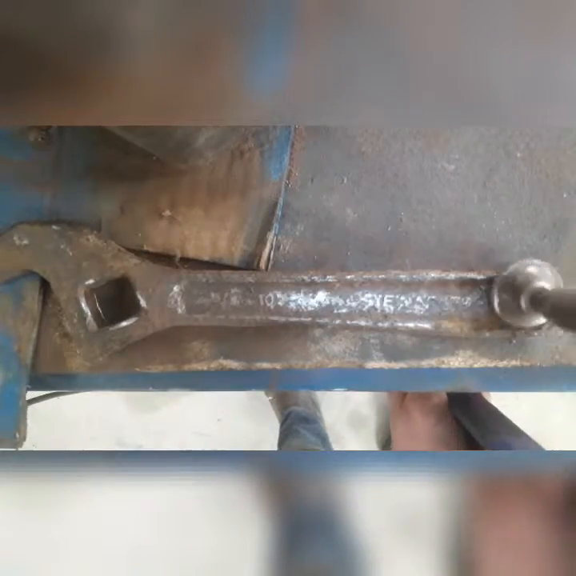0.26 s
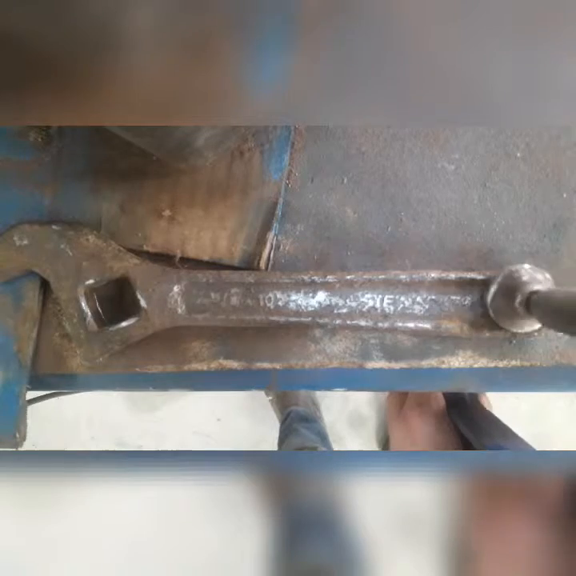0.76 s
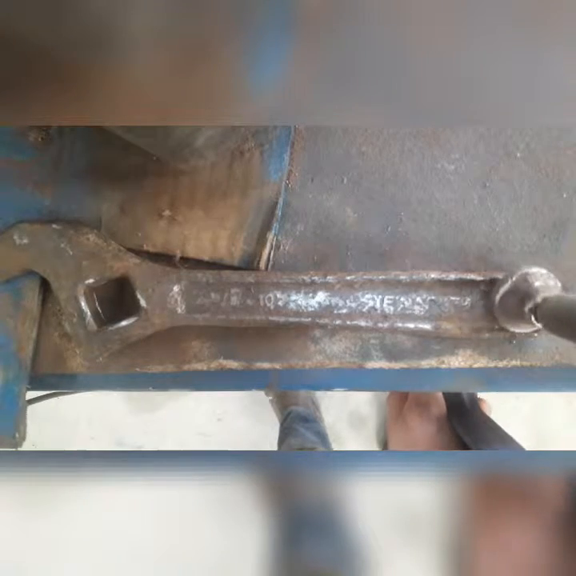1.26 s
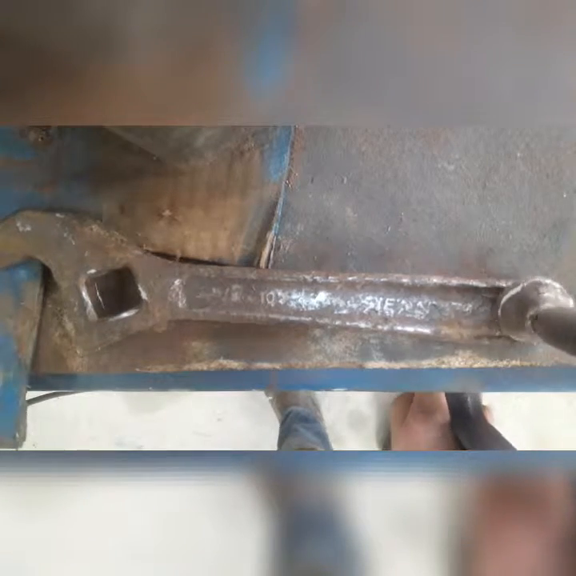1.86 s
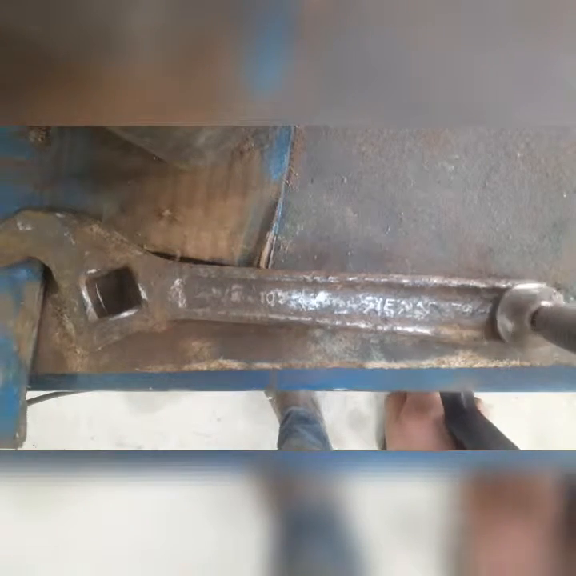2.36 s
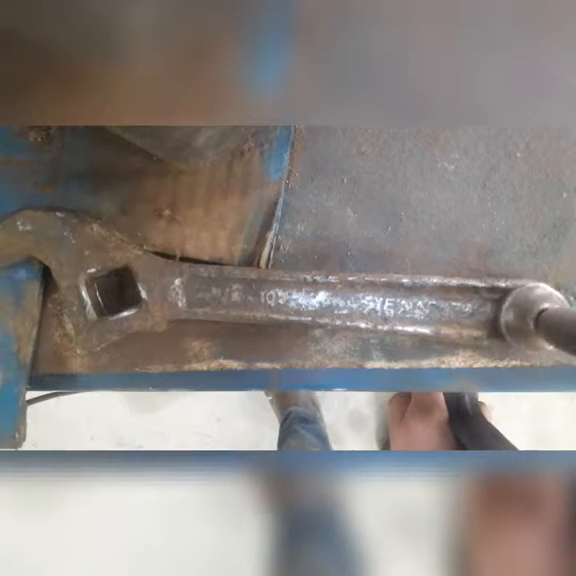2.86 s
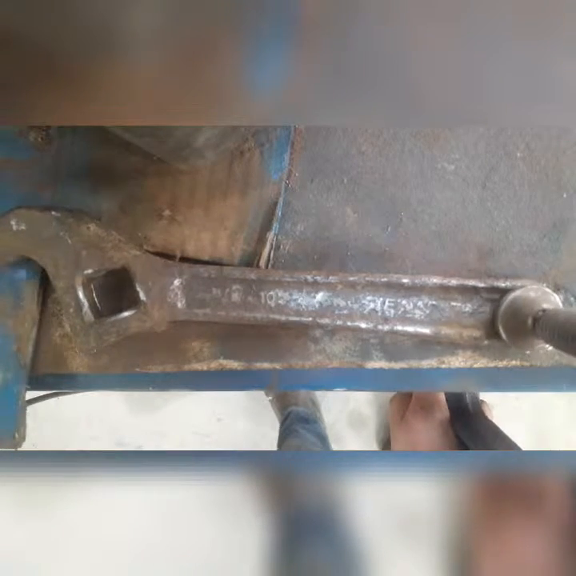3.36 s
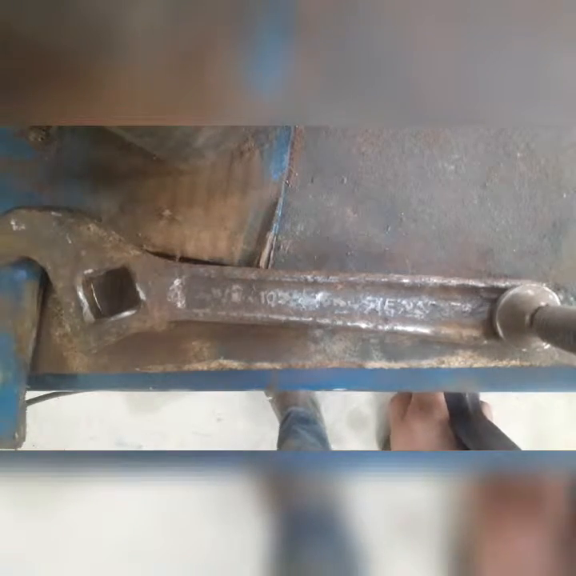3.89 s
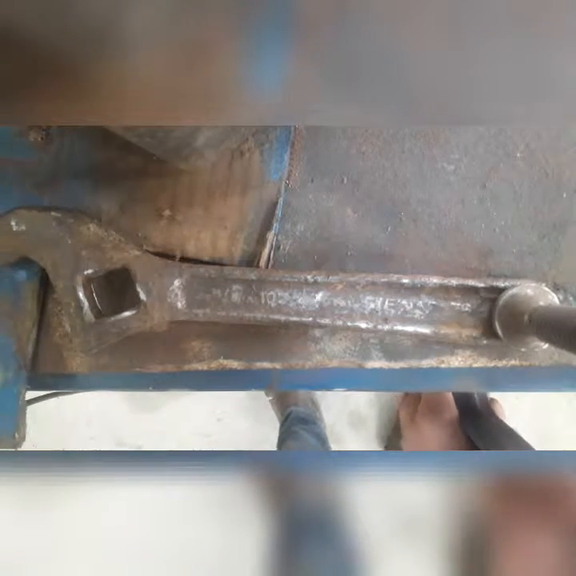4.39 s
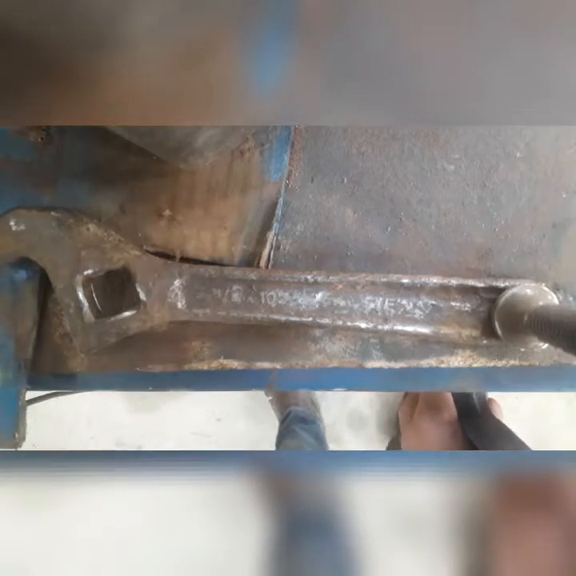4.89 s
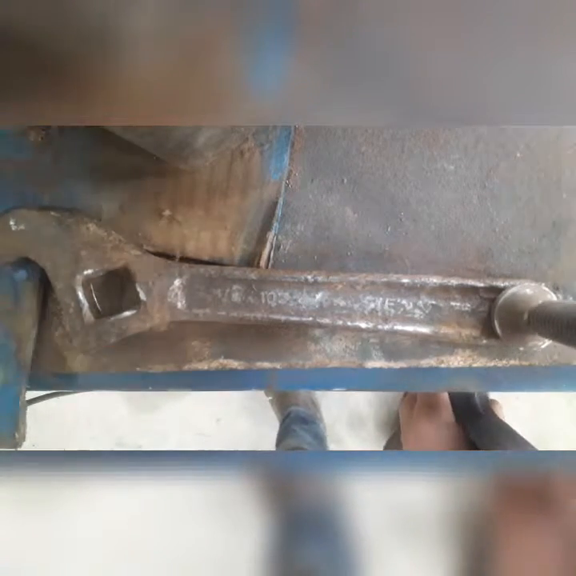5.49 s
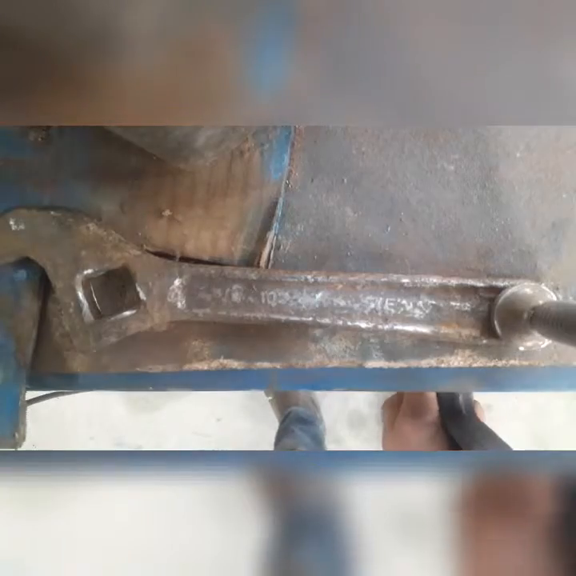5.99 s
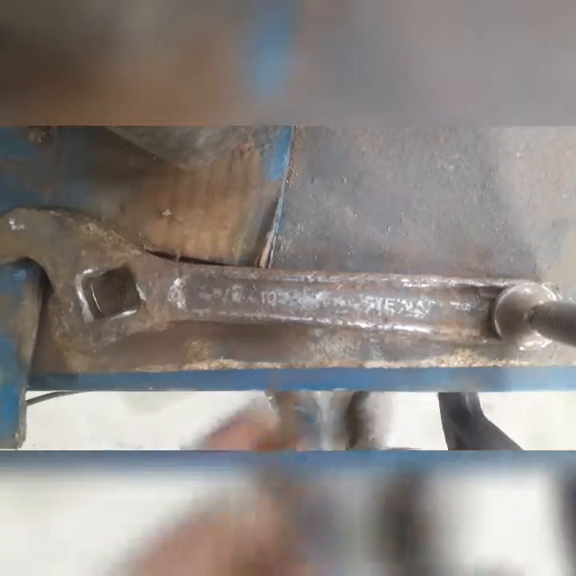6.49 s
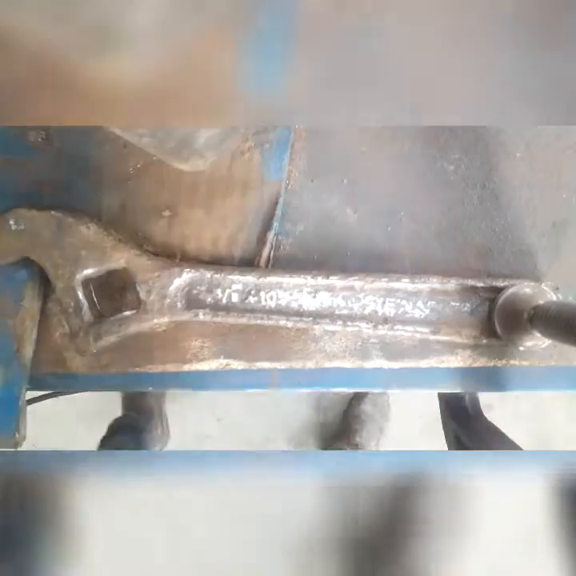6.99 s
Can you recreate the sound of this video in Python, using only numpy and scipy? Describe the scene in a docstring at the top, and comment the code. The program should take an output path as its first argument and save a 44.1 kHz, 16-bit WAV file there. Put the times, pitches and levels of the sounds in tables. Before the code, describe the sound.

Steel taps steel in a quick, irregular flurry, high and ringing, with tiny rattling rasps between. After a lull a tight double clatter follows, then quieter rubbing and scraping of the tool on a metal bench. Later contacts are dull and damped: knocks, thuds, small ticks. Near the end soles drag over grit. Small close microphone, slight room tail, soft traffic-like rumble and hiss behind.

```python
"""A steel spanner is shifted about on a metal bench in an open workshop, over a dull far rumble.
First come bright clinks and chatter of steel on steel: ringing tones and short bursts of tiny impacts.
Slides run from the start until near six seconds: filtered random catches, with a crunch of rust.
From just before four seconds the bench is knocked a few times: a hard contact and a dull thud.
Near the end feet shuffle on the gritty floor: filtered grains. The rumble, a wash and a hiss never stop."""
import sys
import numpy as np
from scipy import signal
from scipy.fft import rfft, irfft
from scipy.io import wavfile

SR = 44100
rng = np.random.default_rng(int(sys.argv[2]) if len(sys.argv) > 2 else 0)


def transcribe(u):
    """Save the signal u as a 16-bit wav file named by the first command-line argument.

    u: samples, shape (n,) or (channels, n), limited to [-1, 1]; the rate is SR.
    q: integer samples, one column per channel.
    """
    v = np.clip(np.atleast_2d(u).T, -1, 1)
    q = np.round(v * 32767).astype(np.int16)
    wavfile.write(sys.argv[1], SR, q)


N = 319725
TIME = np.arange(N) / SR

# A "mode" is one tone an object can ring at; "t60" is the time a ring takes to fade by 60 dB.
# Steel strikes steel; the point struck decides how the modes share the blow.
# Each row: start in seconds, main mode level in dB, low modes in dB relative to the main,
# top modes in dB relative to the main, basic t60 in seconds.
CLINKS = [(0.0721, -26.5, -19.5, -33.5, 0.47), (.149, -29.5, -14, -39, 0.24),
          (0.172, -32.5, -23, -24.5, 0.18), (0.255, -44.5, -17, -43, 0.24),
          (0.3686, -30, -20.5, -28.5, 0.18), (.415, -45, -17, -34, 0.17), (0.5225, -31.5, -16.5, -33, 0.22),
          (.5632, -28, -21, -14.5, 0.14), (.628, -42.5, -23, -29, 0.19), (0.759, -47.5, -11, -32, 0.065),
          (0.776, -45, -22, -47, 0.44), (0.8182, -37, -15, -20, 0.17), (.839, -36, -29, -17, 0.07),
          (.858, -44, -26, -17, 0.13), (.907, -55, -18, -27, 0.22), (.987, -54.5, -8, -25, 0.047),
          (1.0071, -44, -15, -35, 0.16), (1.032, -46, -35, -37, 0.23), (1.052, -45.5, -34.5, -46, 0.27),
          (1.627, -46, -18, -30.5, .18), (2.0948, -30.5, -10, -26, .2), (2.098, -31.5, -5, -10.5, 0.25),
          (2.1122, -30.5, -11, -13, 0.12), (2.127, -31, -12.5, -27, 0.12), (2.1825, -32.5, -18, -27, .12),
          (2.652, -49.5, -14, -36, .11)]
# Where the deep, low, main and top modes lie, in Hz.
GROUP_HZ = [1500, 2900, 4540, 10900]
# Modes of the steel, one entry per mode in each table: basic pitch in Hz.
STEEL_HZ = [1416, 1510, 2035, 2905, 4157, 4543, 4570, 4800, 5384, 6427, 6978, 7623, 7740, 9281, 10881,
            11030, 11937, 14045, 14649]
# Strength of each mode within its group in dB.
STEEL_DB = [-11, -4, -13.5, -0.5, -11.5, 0, -16.5, -21.5, -12.5, -1, -2.5, -19, -20.5, -11.5, -0.5, -13, -8,
            -17, -10.5]
# Ring time of each mode as a multiple of the blow's basic t60.
STEEL_RING = [0.97, 0.5, 1.4, 0.97, 0.4, 1.005, 0.81, 0.47, 0.71, 0.9, 1, 1.37, 1.2, 1.1, 1.2, 0.41, 1.1,
              1.1, 1.0]
# Edges judder over each other. Each row: start in seconds, length before release in seconds,
# driving level in dB, treble in dB relative to that.
RASPS = [(0.096, 0.013, -37.5, -17), (.112, 0.0099, -32.5, -14), (0.165, 0.0061, -38, -20),
         (0.3636, 0.0079, -42.5, -26), (0.461, 0.0055, -63, -6.5), (0.482, 0.0068, -39, -20),
         (0.518, 0.0032, -39, -22), (.546, 0.02, -46, -20), (0.59, 0.0059, -54, -15),
         (0.819, 0.002, -36, -34), (0.827, 0.028, -48, -16), (1.581, 0.0065, -58.5, -23.5),
         (1.626, 0.0055, -45, -8.5), (2.09, .022, -43, -29.5), (2.158, 0.026, -39, -11.5),
         (2.693, 0.0054, -51, -23), (2.757, 0.0029, -51.5, -18), (2.991, 0.0096, -57, -26.5),
         (3.0984, 0.0035, -38, -16), (3.13, 0.015, -40, -10), (3.926, 0.0032, -43.5, -28),
         (4.251, 0.0073, -61.5, -40), (4.402, .005, -53, -28), (4.546, .004, -56, -12),
         (4.861, 0.006, -54.5, -41), (5.201, 0.0059, -53, -21), (5.656, 0.0022, -52, -41)]
# Resonances of steel held down, quickly damped. Each row: pitch in Hz, width in Hz, relative level in dB.
HELD = [(1090, 260, -18.5), (1410, 110, -16), (2090, 54, -12), (2343, 57, -10.5), (2541, 120, -5),
        (2830, 270, -6), (3360, 220, -5.5), (3867, 160, -4.5), (4500, 110, 2), (4870, 140, 0),
        (5200, 330, -7.5), (5970, 170, -11.5), (6470, 65, -8.5), (7500, 160, -23), (7710, 170, -22)]
# Its treble resonances. Each row: pitch in Hz, width in Hz, relative level in dB.
HELD_TOP = [(7720, 83, 1), (9780, 40, -3), (11140, 130, -3), (11400, 75, -9.5), (12400, 400, -19.5),
            (14300, 280, -15.5)]
# A few modes escape the damping and sing on. Each row: pitch in Hz, width in Hz, relative level in dB.
FREE_MODES = [(2405, 17, 0), (2600, 20, 4), (3745, 19, 9.5), (4470, 39, 1.5), (4990, 27, -0.5),
              (8450, 3, -32), (9700, 17, -21.5), (10400, 21, -23.5)]
# Resonances once the steel lies flat on the bench.
# Each row: pitch in Hz, width in Hz, relative level in dB.
SEATED = [(2660, 350, -6.5), (2890, 250, -2.5), (3480, 110, -1), (3860, 250, 0.5), (4770, 150, 6.5),
          (5130, 170, -2.5), (6030, 210, -13.5), (6720, 83, -32), (8540, 25, -10), (12700, 100, -15),
          (14200, 420, -45)]
# Steel slides on steel. Each row: start in seconds, length before release in seconds,
# driving level in dB, crunch of loose rust in dB relative to that.
SLIDES = [(0.07, .14, -57, -20), (0.36, 0.13, -59.5, -20), (0.74, 0.16, -60.5, -20),
          (1.49, 0.0093, -79.5, 11.5), (1.525, 0.0089, -80, 7), (1.605, 0.05, -63.5, -16),
          (2.045, .05, -57, -30.5), (2.161, .15, -66.5, -28), (2.396, 0.096, -65.5, -41),
          (2.558, 0.24, -68, -22), (2.958, 0.22, -60, -29), (3.406, 0.11, -59.5, -28),
          (3.738, 0.1, -64.5, -6.5), (4.345, 0.21, -55, -8), (4.573, 0.094, -65.5, -3),
          (5.08, 0.12, -62.5, -10), (5.3, 0.47, -71.5, -12), (5.7, 0.24, -75, -2.5)]
# Knocks on the bench. Each row: start in seconds, sharp contact starting level in dB,
# thud base level in dB, pitch the thud favours in Hz.
KNOCKS = [(3.8505, -32, -47, 960), (3.864, -42.5, -47.5, 950), (4.4295, -45, -45, 1200),
          (4.993, -49, -38.5, 614), (5.704, -38.5, -39, 610), (5.7155, -53, -49.5, 570)]
# Modes of the bench. Each row: pitch in Hz, level in dB relative to the thud, t60 in seconds.
BENCH = [(387, -18.5, 0.17), (514, -17, 0.13), (614, -8.5, 0.085), (764, -21.5, 0.049), (873, -10, 0.031),
         (1086, -15.5, 0.16), (1518, -11.5, 0.021), (1864, -9.5, 0.026), (2270, -7, 0.034),
         (2640, -5, 0.024), (3440, -13, 0.031), (4780, -4, 0.039)]
# The bench's many weak panel modes merge into a dull shudder.
# Each row: frequency in Hz, relative level in dB per Hz.
SHUDDER = [(200, -17), (480, -1), (620, -0.5), (950, -5), (1500, -8), (2300, -6), (3500, -6), (6000, -54)]
# Colour of a hard contact. Each row: frequency in Hz, relative level in dB per Hz.
CONTACT = [(300, -42), (1000, 18.5), (1700, -5), (3000, 6.5), (4500, 19), (5600, 2), (6400, 12.5),
           (7500, 1), (9000, -31), (11700, -2.5), (14000, -35), (16000, -45)]
# Thin pings as the steel settles.
# Each row: start in seconds, pitch in Hz, starting level in dB, t60 in seconds.
PINGS = [(3.8505, 8400, -66, 0.11), (3.8505, 9400, -60.5, 0.051), (3.928, 8500, -71, 0.087),
         (3.928, 4580, -36, 0.021), (5.704, 12700, -92, 0.45), (5.703, 8400, -86, 0.21)]
# Small dry ticks. Each row: start in seconds, starting level in dB.
TICKS = [(1.974, -45.5), (2.0043, -42.5), (5.148, -51), (5.854, -51), (6.028, -56.5)]
# Colour of small dry contacts. Each row: frequency in Hz, relative level in dB per Hz.
DRY_CONTACT = [(500, -15), (2000, 7), (4500, 8.5), (6500, 5.5), (8000, -15), (9300, -16.5), (11500, -4.5),
               (13000, -10.5), (16000, -6.5)]
# A sole drags over the floor. Each row: start in seconds, length before release in seconds,
# scuff level in dB, grit level in dB.
SCUFFS = [(6.279, 0.51, -75.5, -84), (6.659, 0.28, -59.5, -64), (6.947, 0.17, -62, -77.5),
          (7.131, 0.095, -60.5, -71.5)]
# Colour of the scuff. Each row: frequency in Hz, relative level in dB per Hz.
SCUFF_COLOUR = [(700, -29), (1500, -1), (2800, 2), (4000, 5.5), (5000, 5), (6200, 0.5), (7200, -6.5),
                (8200, -18), (9200, -36), (16000, -43)]
# Colour of the grit. Each row: frequency in Hz, relative level in dB per Hz.
GRIT_COLOUR = [(7000, -26.5), (9000, -15), (10500, -5), (12000, 1), (14000, -2), (16000, 0)]
# Background level over time, before each layer's own setting.
# Each row: time in seconds, level in dB.
BACKGROUND_LEVEL = [(0.0, -58), (0.18, -63.5), (0.6, -65.5), (1.49, -65), (2.0, -59.5), (2.93, -63),
                    (3.57, -59.5), (5.17, -57), (5.47, -57.5), (6.12, -60), (6.84, -59.5), (7.25, -55.5)]
# Colour of the far rumble. Each row: frequency in Hz, relative level in dB per Hz.
RUMBLE = [(20, -51.5), (30, -43.5), (40, -32.5), (52, -27.5), (65, -28), (90, -4), (130, -2), (160, 1),
          (195, -3), (230, 1.5), (320, 1), (420, -4.5), (560, -10), (750, -27.5), (1500, -57.5)]
# Colour of the wash near 1 kHz. Each row: frequency in Hz, relative level in dB per Hz.
WASH = [(300, -12.5), (600, -3), (750, -1.5), (880, -0.5), (1000, 4.5), (1130, 0.5), (1280, -8),
        (1600, -18), (3000, -47)]
# Colour of the faint hiss. Each row: frequency in Hz, relative level in dB per Hz.
HISS = [(600, 1.5), (1300, 8), (2000, 7.5), (3000, 3.5), (4000, 0.5), (5000, -1), (6000, -10), (7000, -15),
        (8500, -84.5), (11500, -28), (16000, -33.5)]

PRESSED_S = 2.7  # the spanner sings under a slide until it is pressed down here
SEATED_S = 3.7  # from here on the steel lies flat
ROOM_T60_S, ROOM_DB = .5, -17
HIGH_PASS_HZ, CUTOFF_HZ = 43.6, 15800


def clinks(after_db=-25, after_t60=0.39, rock_db=0.54, uneven_db=3.5, deep_db=-28, deep_trade=0.28,
           build_s=0.0009, contact_db=-17, contact_t60=.02):
    """Each blow sets the modes ringing until later contacts damp them; a faint part rings on."""
    out, t = np.zeros(N), np.arange(SR // 2) / SR
    chance = rng.uniform(-1, 1, (len(CLINKS), len(STEEL_HZ), 2))
    following = [row[:2] for row in CLINKS[1:]] + [(N / SR, 0)]
    for (s, main_db, low_db, top_db, t60), (next_s, next_db), luck in zip(CLINKS, following, chance):
        free = damping(s, t) * handover(main_db, next_db, s + t - next_s)
        # a point that favours the low modes starves the deep ones
        shares = [deep_db - deep_trade * low_db, low_db, 0, top_db]
        sound = 0
        for hz, db, longer, (strength, shift) in zip(STEEL_HZ, STEEL_DB, STEEL_RING, luck):
            # modes far from the main one depend most on the exact point struck
            uneven = uneven_db * min(abs(np.log2(hz / GROUP_HZ[2])), 1)
            share_db = np.interp(np.log(hz), np.log(GROUP_HZ), shares)
            level = main_db + db + share_db + uneven * strength
            # the changing support pulls each mode slightly off pitch
            pulled_hz = hz + 9 * shift
            sound = sound + free * ring(t, pulled_hz, level, t60 * longer)
            sound = sound + ring(t, hz, level + after_db, after_t60)
        add(out, s, sound * (1 - np.exp(-t / build_s)))
        add(out, s, crack(main_db + contact_db, contact_t60, CONTACT))
    return out * from_db(rock_db * drift(130))  # the piece rocks on its support as it rings


def rasps(free_db=-12, crunch_db=-9, release_s=0.0023, soft_hz=7500, crunch_hz=14000):
    """Short bursts of stick and slip, made of tiny random impacts, drive the held steel."""
    body, treble, t = np.zeros(N), np.zeros(N), np.arange(SR // 10) / SR
    for s, length, db, bright in RASPS:
        push = np.exp(-np.maximum(t - length, 0) / release_s)
        add(body, s, from_db(db) * push)
        add(treble, s, from_db(db + bright) * push)
    slips = grains(per_s=15000, spread_db=-5.5)
    body, treble = body * slips, treble * slips
    held_body = resonate(low_pass(body, soft_hz), HELD)
    held_treble = resonate(treble, HELD_TOP)
    free_ring = from_db(free_db) * resonate(body, FREE_MODES)
    crunch = from_db(crunch_db) * colour(low_pass(treble, crunch_hz), DRY_CONTACT)
    return held_body + free_ring + held_treble + crunch


def sliding(treble_db=-26, body_db=-2, free_db=-9, sing_db=1, seated_db=-2.0, soft_hz=7000,
            swell=.45, release_s=0.026):
    """Rough spots catch under the sliding steel and shake its modes, and loose rust crunches."""
    catches = grains(per_s=2500, spread_db=6) * jerks(per_s=160, decay_s=0.0028, steady=.45)
    force, crunch = 0, 0
    for s, length, db, rust_db in SLIDES:
        push = from_db(db) * stroke(s, length, swell, release_s) * catches
        force = force + push
        crunch = crunch + from_db(rust_db) * push
    held, seated = force * (TIME < SEATED_S), force * (TIME >= SEATED_S)
    body = from_db(body_db) * resonate(low_pass(held, soft_hz), HELD)
    free_ring = from_db(free_db) * resonate(held, FREE_MODES)
    treble = from_db(treble_db) * resonate(held, HELD_TOP)
    flat = from_db(seated_db) * resonate(seated, SEATED)
    song = from_db(sing_db) * singing(force * (TIME < PRESSED_S))
    return body + free_ring + treble + flat + song + colour(crunch, DRY_CONTACT)


def knocks(contact_t60=0.02, tick_t60=0.0075, scatter_db=-0.5, octave_db=-3, shudder_db=-10,
           shudder_t60=0.092):
    """A hard contact sets the bench thudding; pings ring thinly, and ticks are too light to move it."""
    out, t = np.zeros(N), np.arange(SR // 3) / SR
    chance = rng.standard_normal((len(KNOCKS), len(BENCH)))
    for (s, contact_db, thud_db, centre_hz), luck in zip(KNOCKS, chance):
        add(out, s, crack(contact_db, contact_t60, CONTACT))
        add(out, s, crack(thud_db + shudder_db, shudder_t60, SHUDDER))
        for (hz, db, t60), k in zip(BENCH, luck):
            # modes lose level with each octave away from the favoured pitch
            level = thud_db + db + scatter_db * k + octave_db * abs(np.log2(hz / centre_hz))
            add(out, s, np.sign(k) * ring(t, hz, level, t60))
    for s, hz, db, t60 in PINGS:
        add(out, s, ring(t, hz, db, t60))
    for s, db in TICKS:
        add(out, s, crack(db, tick_t60, DRY_CONTACT))
    return out


def shuffle(uneven_db=2.2, swell=0.36, release_s=0.045):
    """Soles drag over fine grit, making many tiny impacts of uneven strength."""
    rub = grains(per_s=16000, spread_db=3) * from_db(uneven_db * drift(50))
    scuff, grit = 0, 0
    for s, length, scuff_db, grit_db in SCUFFS:
        drag = stroke(s, length, swell, release_s) * rub
        scuff = scuff + from_db(scuff_db) * drag
        grit = grit + from_db(grit_db) * drag
    return colour(scuff, SCUFF_COLOUR) + colour(grit, GRIT_COLOUR)


def ring(t, hz, db, t60):
    """One dying mode: a sine wave that starts at the given rms level."""
    return np.sqrt(2) * from_db(db - 60 * t / t60) * np.sin(2 * np.pi * hz * t)


def crack(db, t60, spectrum):
    """A brief crunch of contact: coloured noise that dies away."""
    t = np.arange(SR // 10) / SR
    return colour(from_db(db - 60 * t / t60) * rng.choice([-1, 1], len(t)), spectrum)


def damping(s, t, loss_db=4):
    """Every rasp that comes after a blow takes some of its ring away."""
    rubbed = sum(np.clip((s + t - start) / length, 0, 1) for start, length, *_ in RASPS if start > s)
    return from_db(-loss_db * rubbed)


def handover(main_db, next_db, since_next_s, stop_db=22, soft_slope=1.3):
    """The next blow damps what still rings within 2 ms; a much softer touch lets it go on."""
    loss_db = max(stop_db - soft_slope * (main_db - next_db), 0)
    return from_db(-loss_db * np.clip(since_next_s / .002, 0, 1))


def resonate(force, modes):
    """Damped resonances side by side, signs alternating; unit power gain."""
    t = np.arange(SR // 2) / SR
    response = 0
    for k, (hz, width, db) in enumerate(modes):
        fade = width * np.exp(-np.pi * width * t)  # a wider resonance dies sooner
        response = response + (-1) ** k * from_db(db) * fade * np.sin(2 * np.pi * hz * t)
    return signal.fftconvolve(force, rms_one(response) / np.sqrt(len(t)))[:N]


def singing(force, width_hz=20, octave_db=-19):
    """Rubbing keeps the modes of the free steel ringing, most of all those near the main one."""
    modes = [(hz, width_hz, db + octave_db * abs(np.log2(hz / GROUP_HZ[2])))
             for hz, db in zip(STEEL_HZ, STEEL_DB)]
    return resonate(force, modes)


def stroke(start_s, length_s, swell, release_s):
    """A rubbing stroke swells over a share of its length, holds, then dies away."""
    rise = np.clip((TIME - start_s) / (swell * length_s), 0, 1)
    return rise * np.exp(-np.clip((TIME - start_s - length_s) / release_s, 0, 20))


def jerks(per_s, decay_s, steady):
    """A gain for stick and slip: random catches that die away, over a steady share; unit power."""
    power = grains(per_s, spread_db=-1) ** 2 + 1e-18
    fading = signal.lfilter([1], [1, -np.exp(-2 / (decay_s * SR))], power)
    catches = np.sqrt(np.abs(fading))
    return np.sqrt(steady + (1 - steady) * rms_one(catches) ** 2)


def grains(per_s, spread_db):
    """Random tiny impacts of uneven size; unit power."""
    sizes = from_db(spread_db * np.clip(rng.standard_normal(N), -2, 2)) * rng.choice([-1, 1], N)
    return rms_one(sizes * (rng.random(N) < per_s / SR))


def drift(rate):
    """A slow random wander of unit power, drawn through the given number of random points a second."""
    knots = rng.standard_normal(int(N / SR * rate) + 2)
    return rms_one(np.interp(TIME * rate, np.arange(len(knots)), knots))


def low_pass(x, hz):
    """A soft contact passes little above this pitch."""
    return signal.sosfilt(signal.butter(3, hz, fs=SR, output="sos"), x)


def colour(x, spectrum):
    """Filter a sound to follow a spectrum without sounding early (minimum phase); unit power gain."""
    size = 4096
    hz, db = np.transpose(spectrum)
    bins_hz = np.arange(size + 1) * SR / (2 * size)
    gain = rms_one(from_db(np.interp(np.log(bins_hz + 1), np.log(hz), db)))
    # folding the cepstrum forward in time gives the minimum phase
    fold = np.r_[1, np.full(size - 1, 2), 1, np.zeros(size - 1)]
    cepstrum = irfft(np.log(gain)) * fold
    return signal.fftconvolve(x, irfft(np.exp(rfft(cepstrum))))[:len(x)]


def from_db(db):
    """Decibels to gain."""
    return 10 ** (np.asarray(db) / 20)


def rms_one(x):
    """Scale to unit power."""
    return x / np.sqrt(np.mean(x ** 2) + 1e-20)


def add(out, s, sound):
    """Mix a sound in at a given time in seconds."""
    start = max(0, round(s * SR))
    out[start:start + len(sound)] += sound[:N - start]


def workshop(x, first_echo_s=0.004):
    """The walls return a diffuse tail: noise that fades away."""
    t = np.arange(SR) / SR
    tail = rng.standard_normal(SR) * from_db(-60 * t / ROOM_T60_S) * (t > first_echo_s)
    return from_db(ROOM_DB) * signal.fftconvolve(x, rms_one(tail) / np.sqrt(SR))[:N]


def surroundings(rumble_db=-0.5, wash_db=-5, hiss_db=-9.0, waver_db=0.79):
    """A far rumble like traffic, a wash and a faint hiss follow one level curve; each also wavers."""
    s, level_db = np.transpose(BACKGROUND_LEVEL)
    total = 0
    for spectrum, db in ((RUMBLE, rumble_db), (WASH, wash_db), (HISS, hiss_db)):
        waver = from_db(db + waver_db * drift(12))
        total = total + waver * colour(rng.standard_normal(N), spectrum)
    return from_db(np.interp(TIME, s, level_db)) * total


def scene():
    """Close handling noises and footsteps, their room, and the surroundings."""
    handling = rasps() + sliding() + knocks() + shuffle()
    ringing = clinks()
    room = workshop(handling + from_db(-19.5) * ringing)  # the clinks feed the room far less
    return (handling + ringing + room + surroundings())[None]


def record(dry):
    """The deepest bass is taken away; the top is cut steeply."""
    thin = signal.sosfilt(signal.butter(3, HIGH_PASS_HZ, "high", fs=SR, output="sos"), dry)
    return signal.sosfilt(signal.ellip(10, .1, 70, CUTOFF_HZ, fs=SR, output="sos"), thin)


dry = scene()
out = record(dry)
transcribe(out)
```